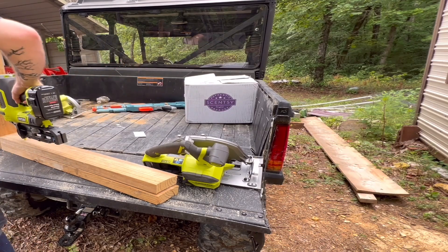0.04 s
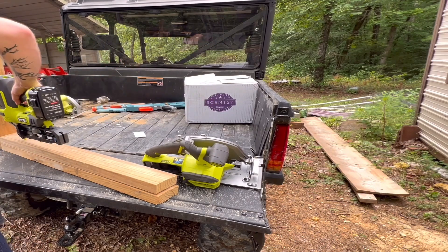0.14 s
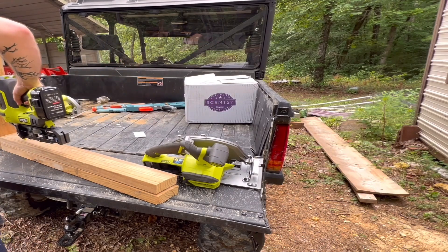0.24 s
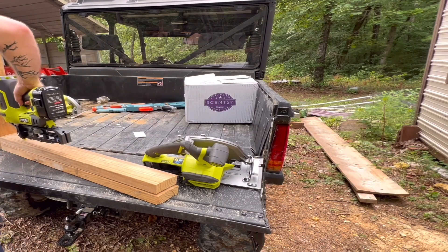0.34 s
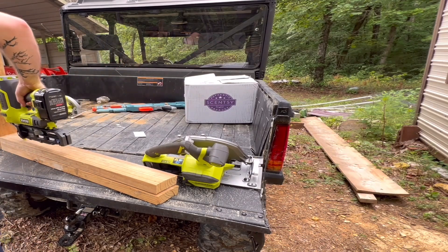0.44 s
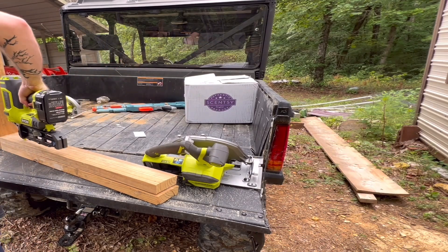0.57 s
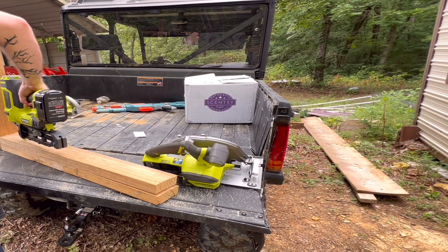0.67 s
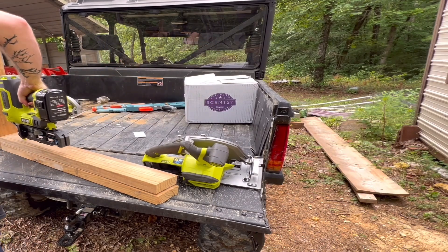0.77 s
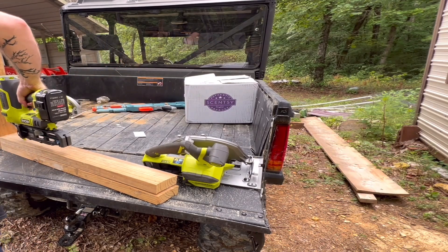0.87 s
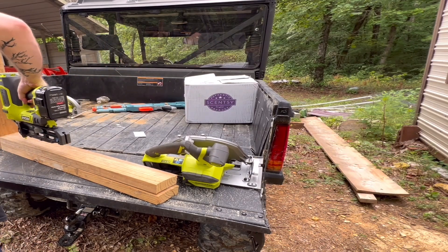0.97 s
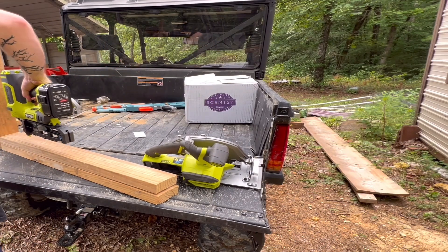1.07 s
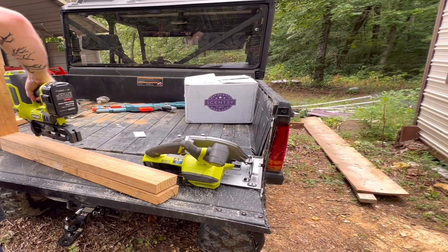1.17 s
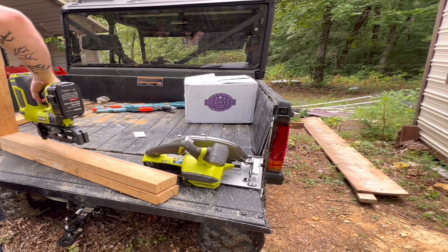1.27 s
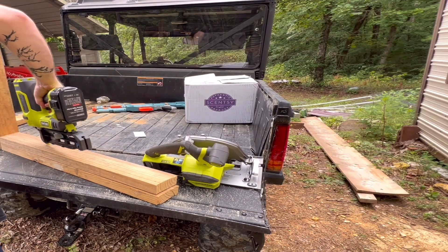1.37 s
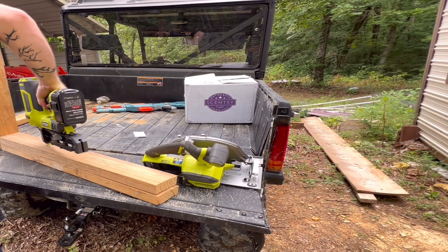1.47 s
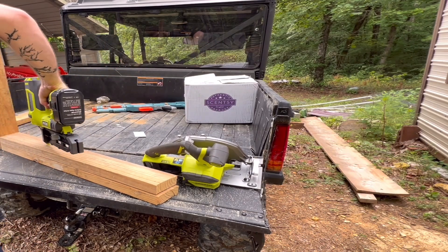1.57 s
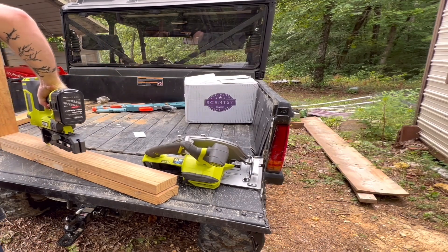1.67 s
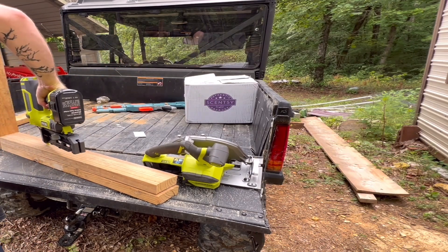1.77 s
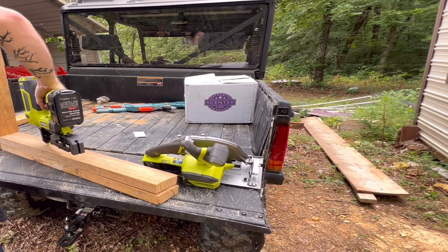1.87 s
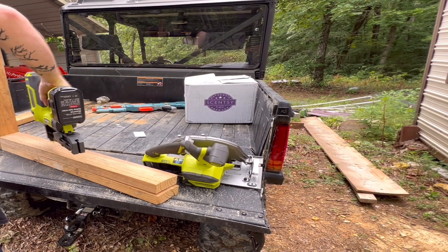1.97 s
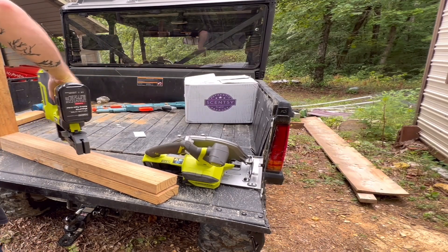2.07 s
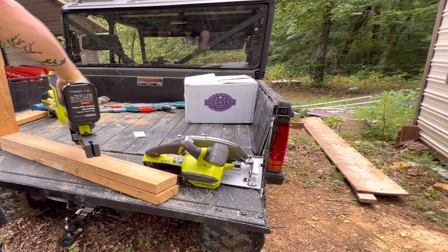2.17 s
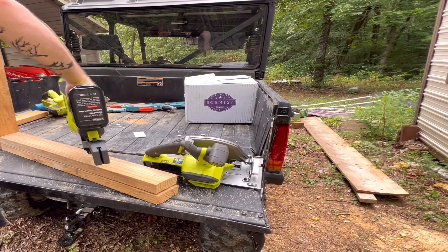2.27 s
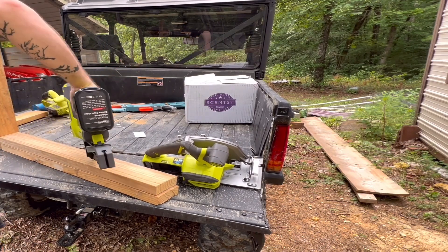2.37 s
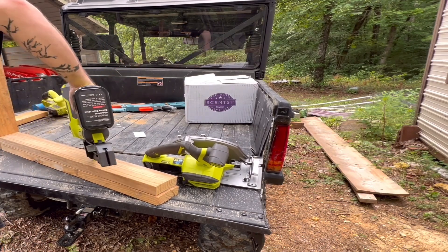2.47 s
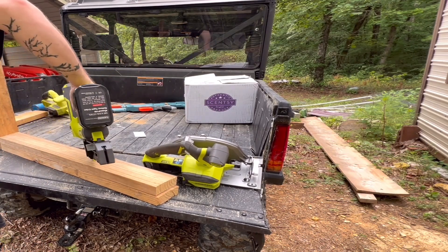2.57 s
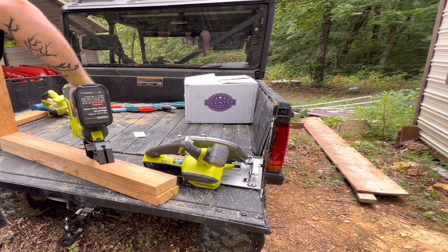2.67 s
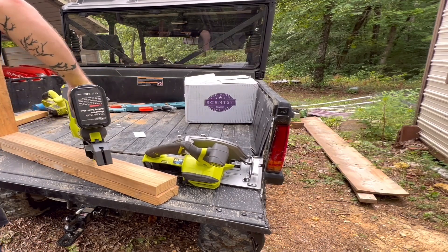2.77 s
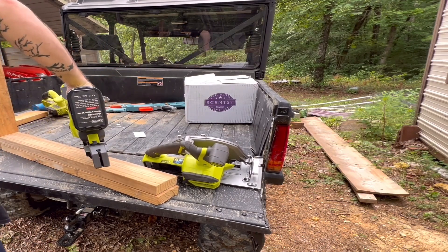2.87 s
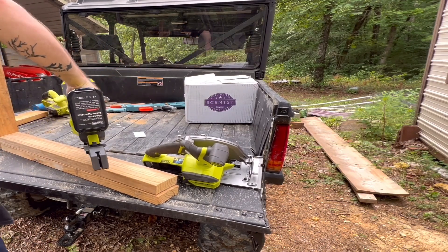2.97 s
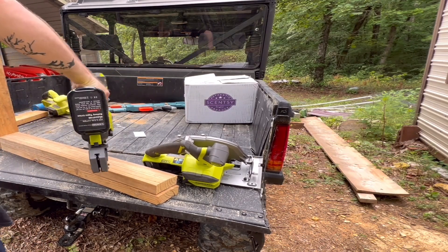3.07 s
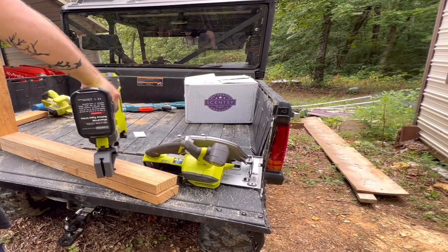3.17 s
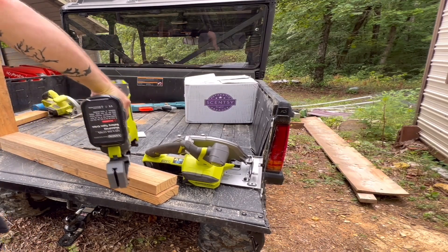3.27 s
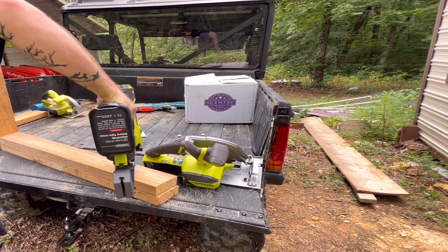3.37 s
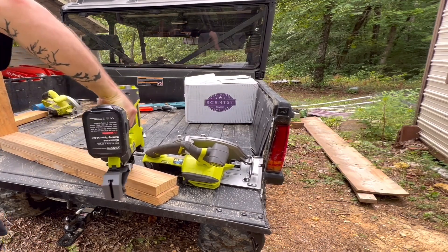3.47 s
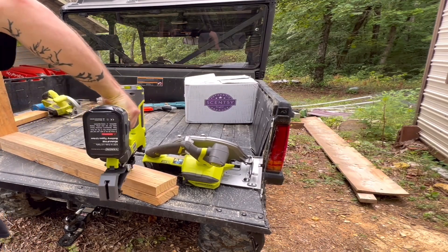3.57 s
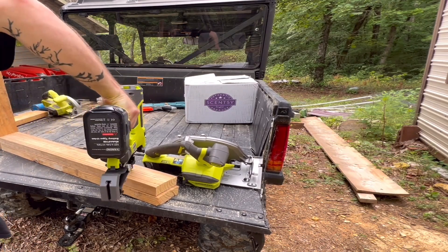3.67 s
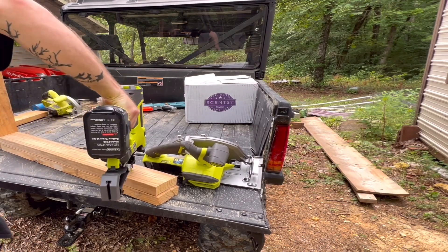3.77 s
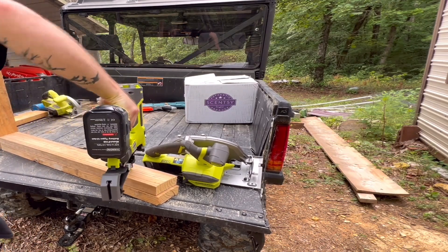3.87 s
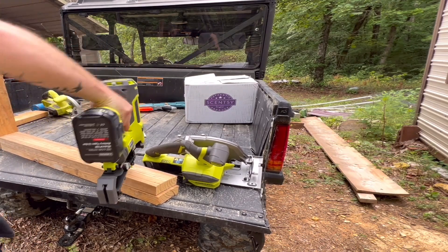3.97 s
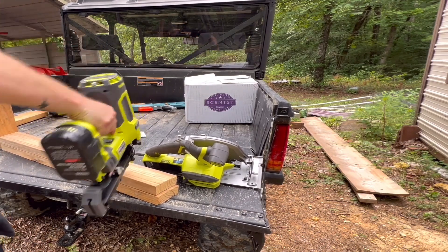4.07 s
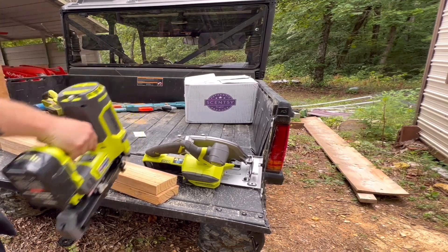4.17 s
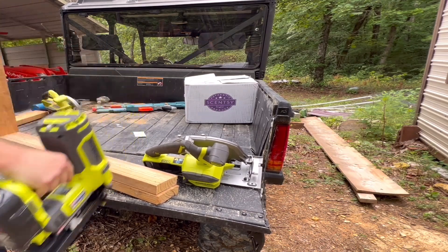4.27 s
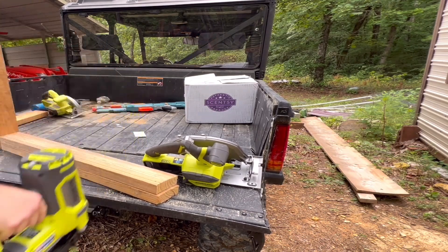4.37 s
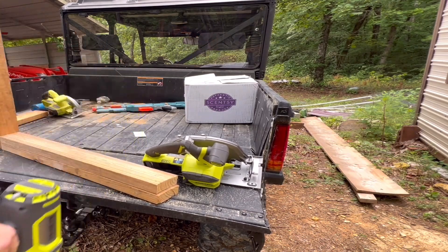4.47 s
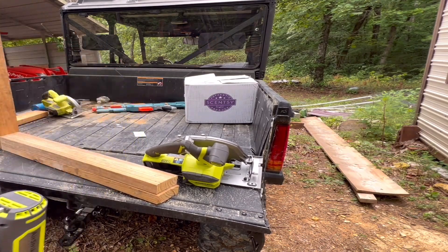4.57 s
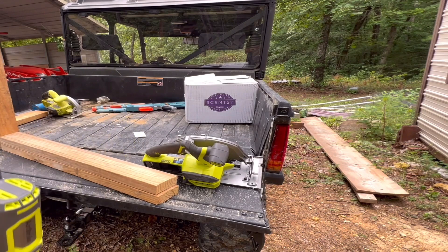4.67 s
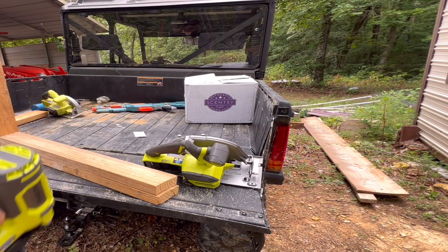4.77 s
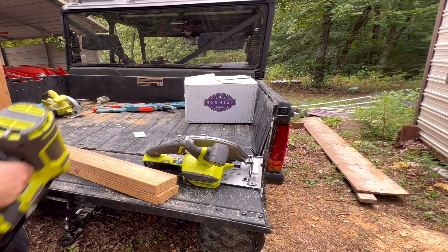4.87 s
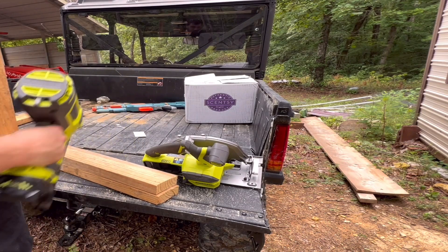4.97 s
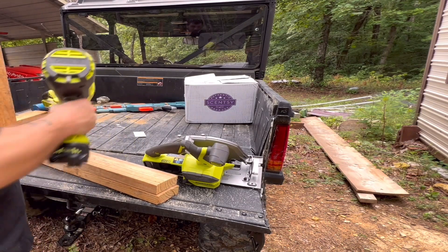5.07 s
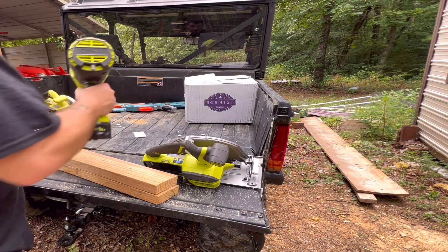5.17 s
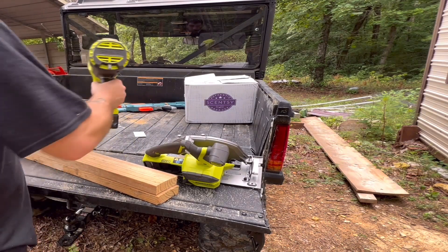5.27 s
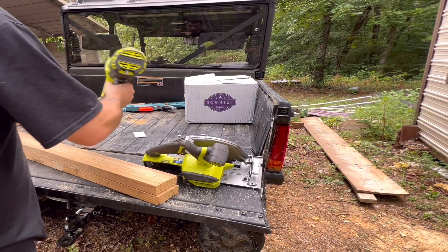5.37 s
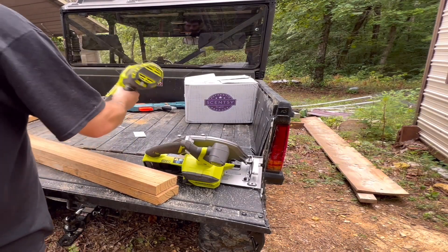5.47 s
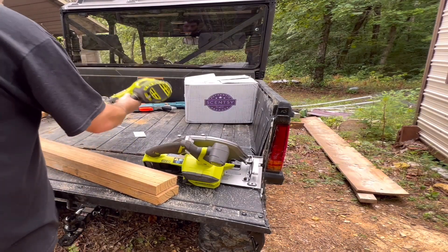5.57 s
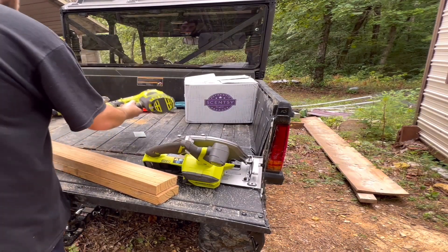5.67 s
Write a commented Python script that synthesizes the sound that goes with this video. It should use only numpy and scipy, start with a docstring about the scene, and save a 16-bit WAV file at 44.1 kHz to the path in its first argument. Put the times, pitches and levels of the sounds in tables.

```python
"""A battery nailer fires four nails into a timber beam lying on a steel truck bed, in a yard by the woods.
Each shot: trigger, motor bite, whine up (gear tones and grit), driver slam, light coasting, stop with a clack.
Blows are noise contacts that crack in the air and ring beam and bed modes; magazine steel rings on.
Coloured noise makes insects, far hiss and a low rumble; two spaced microphones hear lag and echoes."""
import sys
import numpy as np
from scipy import signal
from scipy.fft import rfft, irfft, next_fast_len
from scipy.io import wavfile
from scipy.ndimage import uniform_filter1d

SR = 44100
rng = np.random.default_rng(int(sys.argv[2]) if len(sys.argv) > 2 else 0)


def wav_out(sig):
    """Save sig, one row per channel (or a flat mono array), as 16-bit PCM at SR to the path in sys.argv[1]."""
    wavfile.write(sys.argv[1], SR, np.round(np.clip(np.atleast_2d(sig).T, -1, 1) * 32767).astype(np.int16))


def invert_db(level):
    """Linear amplitude ratio for a level in decibels (20 dB per decade), elementwise."""
    return 10 ** (np.asarray(level, dtype=float) / 20)


N = 252470
T = np.arange(N) / SR

# four moments of the cycle, one row a shot: start_s, air_db, body_db (beam and bed)
TRIGGER = [(0.5045, -27, -49.5), (1.49, -27, -46.5), (2.5447, -39.5, -51.5), (3.4472, -39, -55)]
BITES = [(0.5365, -23.5, -22.5), (1.5187, -21, -21.5), (2.5735, -41, -29.5), (3.478, -36.5, -28.5)]
SHOTS = [(0.766, -9, -19.5), (1.748, -10, -17.5), (2.8035, -12, -17), (3.709, -11.5, -18)]
STOPS = [(1.0319, -19, -32.5), (2.0122, -30.5, -43.5), (3.0668, -30.5, -41.5), (3.9701, -29.5, -39)]
# tool positions: start_s
PLACES = [0, 1.25, 2.2, 3.2, 4.15]


def curve(table, t=T):
    """Columns of a (s, value, ..) table, interpolated at every sample."""
    s, *columns = np.transpose(table)
    return [np.interp(t, s, c) for c in columns]


def gate(t0, t1, fade_s=0.007, t=T):
    """1 between t0 and t1, with linear ramps."""
    return np.clip(np.minimum(t - t0, t1 - t) / fade_s + .5, 0, 1)


def colour(x, points):
    """Filter by (Hz, dB) points, interpolated over log frequency."""
    hz, db = np.transpose(points)
    size = next_fast_len(x.shape[-1])
    f = np.arange(size // 2 + 1) * SR / size + 1
    gain = invert_db(np.interp(np.log(f), np.log(hz + 1), db))
    return irfft(rfft(x, size) * gain, size)[..., :x.shape[-1]]


def unit(x, band_hz=None):
    """Scale to rms 1, over all or in a band."""
    part = x
    if band_hz is not None:
        part = signal.sosfilt(signal.butter(4, band_hz, "band", fs=SR, output="sos"), x)
    return x / np.sqrt(np.mean(part ** 2))


def walk(rate_hz, size=N):
    """Random levels held 1 / rate_hz and slewed twice; spread near 1."""
    k = int(SR / rate_hz)
    held = np.repeat(rng.standard_normal(size // k + 1), k)
    return 1.3 * uniform_filter1d(uniform_filter1d(held, k), k)[:size]


def ring(modes, seconds):
    """Complex decaying response of each (Hz, dB, t60 s) mode, one a row."""
    hz, db, t60_s = (c[:, None] for c in np.transpose(modes))
    t = np.arange(int(seconds * SR)) / SR
    return invert_db(db) * np.exp((2j * np.pi * hz - np.log(1000) / t60_s) * t)


def add(out, x, s):
    """Mix x into out from time s."""
    i = int(s * SR)
    out[i:i + len(x)] += x[:len(out) - i]


def follow(x, attack, release):
    """Level follower: a quick average, then a slow fall."""
    quick = signal.lfilter([attack], [1, attack - 1], x)
    return np.maximum(quick, signal.lfilter([release], [1, release - 1], quick))


def yard():
    """Insects and far hiss, unrelated at the microphones and louder on the left; the rumble is nearly shared."""
    # far hiss with an insect choir near 8 kHz: freq_hz, density_db
    hiss_colour = [(80, -10.5), (125, 0), (200, -7), (400, -10.5), (800, -12), (1300, -16), (2000, -19.5),
                   (2600, -22.5), (4000, -19), (6300, -19.5), (7500, -16), (8050, -9.5), (8600, -19),
                   (9800, -31.5), (10600, -40.5), (11300, -93)]
    # start_s, level_db
    hiss_level = [(0, -58), (.5, -61.5), (1.2, -54.5), (1.45, -62), (2.2, -70), (3.2, -71), (4.2, -71),
                  (4.9, -72.5), (5.72, -73)]
    # lower insects: freq_hz, density_db
    choir_colour = [(4300, -31.5), (4700, -1), (5050, 1), (5500, -3.5), (6800, -10), (7400, -33)]
    # start_s, level_db
    choir_level = [(0, -75.5), (1.3, -72.5), (2.2, -79), (4.5, -87.5), (4.8, -85.5), (5.3, -74.5),
                   (5.72, -78.5)]
    # freq_hz, density_db
    rumble_colour = [(15, -28.5), (30, -8.5), (58, 9), (90, 3.5), (140, -13), (250, -62)]
    # lifted while the truck bed shakes: start_s, level_db
    rumble_level = [(0.0, -61), (0.4, -59.5), (0.94, -56), (1.29, -55.5), (1.67, -51.5), (2.15, -67.5),
                    (2.34, -68.5), (2.5, -59.5), (2.88, -60), (3.23, -67), (3.79, -58), (4.17, -67),
                    (4.62, -69.5), (4.8, -71.5), (5.35, -75.5), (5.72, -67)]
    hiss = unit(colour(rng.standard_normal((2, N)), hiss_colour))
    air = hiss * invert_db(curve(hiss_level)[0] + walk(2.4))
    choir = unit(colour(rng.standard_normal((2, N)), choir_colour))
    air += choir * invert_db(curve(choir_level)[0] + 2.5 * walk(14))
    rumble = unit(colour(rng.standard_normal((2, N)), rumble_colour))
    mid, side = rumble * invert_db(curve(rumble_level)[0] + 2.0 * walk(2.3))
    left_right = invert_db(np.array([[1.5], [-1.5]]))
    return np.sqrt(2) * air * left_right + mid + 0.12 * side * np.array([[1], [-1]])


def tail(t60_s, db):
    """Scattered echoes: decaying noise with unit energy, scaled."""
    t = np.arange(int(t60_s * SR)) / SR
    x = rng.standard_normal(len(t)) * np.exp(-np.log(1000) * t / t60_s)
    return invert_db(db) * x / np.sqrt(np.sum(x ** 2))


def place_spans():
    """First and end sample of each tool position."""
    edges = (np.array(PLACES + [T[-1]]) * SR).astype(int)
    return list(zip(edges, edges[1:]))


def wash(knocks, whir):
    """Shed wall and trees return a faint wash, most of it from the knocks that the bed throws outward."""
    source = knocks + .5 * whir
    return np.array([signal.fftconvolve(source, tail(0.72, -20.5))[:N] for _ in range(2)])


def wall_echoes(tool):
    """Bed walls echo with opposite sign to left and right, in a new pattern at every place."""
    # microphone difference: freq_hz, side_minus_mid_db
    apart = [(60, -17.5), (110, -19.5), (200, -14.5), (380, -4.5), (700, 5), (1290, -0.5), (2380, -4),
             (4400, -2), (8120, 1), (15000, -0.5)]
    # surplus of the left microphone at each place: gain
    left_share = [.3, .3, .18, .25, .3]
    walls = np.zeros(N)
    for (i0, i1), left in zip(place_spans(), left_share):
        # the tool sways in the hand, so one echo pattern keeps melting into another
        sway = 0.4 * walk(25, size=i1 - i0)
        for share in (np.cos(sway), np.sin(sway)):
            add(walls, signal.fftconvolve(share * tool[i0:i1], tail(0.028, -2.8)), i0 / SR)
        walls[i0:i1] += left * tool[i0:i1]
    return colour(walls, apart) * np.array([[1], [-1]])


def spaced_pair(tool):
    """Lows reach the right microphone later than the left; the highs arrive together."""
    # right behind left at each place: lag_samples
    lags = (8, 8, 5, 4, 4)
    low = signal.sosfiltfilt(signal.butter(1, 2400, fs=SR, output="sos"), tool)
    direct = np.array([tool - low] * 2)
    for (i0, i1), lag in zip(place_spans(), lags):
        direct[0, i0:i1] += np.roll(low, -(lag // 2))[i0:i1]
        direct[1, i0:i1] += np.roll(low, lag - lag // 2)[i0:i1]
    return direct


def magazine():
    """Thin steel that rings on after every drive, blurred as the tool moves."""
    # freq_hz, level_db, t60_s
    steel = [(1762, 0, 1.1), (1740, 2.5, 2.8), (1770, 1.5, 1.1)]
    # shot by shot: level_db
    steel_db = (-53, -57, -60, -61)
    out, modes = np.zeros(N), ring(steel, 1.3)
    size = modes.shape[1]
    for row, db in zip(SHOTS, steel_db):
        blur = np.array([walk(250, size=size) + 1j * walk(250, size=size) for _ in modes])
        add(out, invert_db(db) * (modes * blur).imag.sum(axis=0) * np.linspace(1, 0, size), row[0])
    return out


def recoil():
    """The drive shoves beam and bed down and they spring back: a damped swing with 9 ms half periods."""
    out, t = np.zeros(N), T[:int(.12 * SR)] / .009
    for row in SHOTS:
        add(out, np.sin(np.pi * t) * np.exp(-.7 * t), row[0])
    return invert_db(-21) * out


def tone(turns, db, waver_db=3.0, blur_rad=0.77):
    """A gear tone near the given rms level; teeth are uneven, so level and phase waver."""
    phase = 2 * np.pi * (turns + rng.random()) + blur_rad * walk(120, size=len(turns))
    return np.sqrt(2) * invert_db(db + waver_db * walk(60, size=len(turns))) * np.sin(phase)


def clatter(turns):
    """Tooth faults come round every second turn of the train, so this noise repeats and breaks into fine lines."""
    faults = rng.standard_normal(512)
    cycle = np.interp(turns / 2 % 1, np.arange(512) / 512, faults, period=1)
    return cycle * invert_db(2.0 * walk(90, size=len(turns)))


def lift_tones(shot, run):
    """Train turns and mesh and shaft tones under load; the speed climbs quickly from the bite and levels off."""
    # multiples of the gear train rate
    mesh = (13, 14, 27, 40, 50)
    # row a shot, column a mesh multiple: level_db early in the lift, then at its end
    mesh_early = [(-38.5, -33, -27, -47, -33.5), (-36.5, -30, -33.5, -38.5, -42.5),
                  (-41.5, -41, -41, -56.5, -54.5), (-41.5, -45, -38, -50.5, -46)]
    mesh_late = [(-35, -32, -23.5, -31.5, -57), (-26.5, -32.5, -35, -24.5, -60.5),
                 (-43.5, -49, -40.5, -46.5, -52.5), (-42.5, -46.5, -45, -39.5, -43.5)]
    # weaker shaft and gear tones: multiples of the gear train rate
    orders_weak = (2.22, 4.44, 6.63, 8, 8.8, 10, 11.1, 26.05, 30, 47.9, 53.9)
    # row a weak order, column a shot: level_db
    weak_db = [(-44, -46.5, -60, -59), (-57.5, -58, -67.5, -61.5), (-38, -48, -53.5, -43.5),
               (-47.5, -47, -55, -53), (-49, -54, -46, -46.5), (-42, -43.5, -53.5, -54),
               (-40.5, -56.5, -53, -56), (-40, -44.5, -55, -49), (-52, -65, -69.5, -70.5),
               (-43, -49, -62.5, -64.5), (-51.5, -59.5, -57, -58)]
    # gear train rate at full speed, shot by shot: rate_hz
    full_hz = (138.5, 140.0, 140.8, 140.6)
    turns = np.cumsum(full_hz[shot] - 21 * np.exp(-run / .037)) / SR
    late = np.clip((run - .04) / .14, 0, 1)
    tones = sum(tone(k * turns, a + (b - a) * late)
                for k, a, b in zip(mesh, mesh_early[shot], mesh_late[shot]))
    tones += sum(tone(k * turns, row[shot], waver_db=4.5) for k, row in zip(orders_weak, weak_db))
    return turns, tones


def coast_tones(shot, run):
    """Whine turns and tones free of load: the motor speeds up and levels off."""
    # one row a shot: end_hz, whine_db, third_db (whine / 3), shaft_db
    coast = [(6630, -46.5, -54, -53.5), (6530, -65, -57, -56), (6520, -65, -63, -53.5),
             (6620, -57.5, -69, -54.5)]
    # growth of the whine towards the stop, shot by shot: swell_db
    coast_swell_db = (14, 0, 0, 0)
    hz, high_db, third_db, shaft_db = coast[shot]
    turns = np.cumsum(hz + (6130 - hz) * np.exp(-run / 0.044)) / SR
    shaft = turns * .0495
    whine = tone(turns, high_db + coast_swell_db[shot] * np.minimum(run / .14 - 1, 0))
    whine += tone(turns / 3, third_db) + tone(shaft, shaft_db)
    whine += tone(2 * shaft, shaft_db - 5, waver_db=4.5) + tone(turns * .26, shaft_db - 7, waver_db=1)
    return turns, whine


def grit_level(shot, trigger, bite, strike, stop):
    """Grit level: loaded lift, free run with rattling parts, then decay after the stop."""
    # one row a shot: load_db, free_db (at first), last_db (at the stop)
    motor_db = [(-43.5, -65.5, -47), (-42.5, -60, -56.5), (-53, -58, -55.5), (-52.5, -62, -52.5)]
    load_db, free_db, last_db = motor_db[shot]
    rise_db = np.interp(T, [trigger, bite, bite + 0.036], [-13.5, -5, 0])
    level = invert_db(load_db + rise_db) * gate(trigger + .006, strike)
    free = invert_db(np.interp(T, [strike + .1, stop], [free_db, last_db]))
    rattle = invert_db(-49 - 177.5 * np.clip(T - strike - .035, 0, 1))  # 177.5 dB/s
    level += np.hypot(free, rattle) * gate(strike + .029, stop + .03)
    brake = invert_db(last_db - 13 - 130 * np.clip(T - stop - .03, 0, 1))  # 130 dB/s
    return level + brake * gate(stop + .03, stop + .3)


def motor():
    """Mesh and shaft tones locked to the gear train, over gritty coloured noise."""
    # coloured noise for the gear grit as heard, with gaps in the treble: freq_hz, density_db
    whir_colour = [(88, -40.5), (150, -22), (317, -2), (417, -27.5), (630, -12), (1310, -8.5), (1620, -8),
                   (4600, -9.5), (6550, -8.5), (10300, -21), (12000, -23), (13000, -19.5), (13800, -40.5),
                   (15300, -16.5), (16500, -48.5)]
    out, teeth, level, run = np.zeros(N), np.zeros(N), np.zeros(N), T[:SR // 4]
    for shot in range(len(SHOTS)):
        trigger, bite, strike, stop = (table[shot][0] for table in (TRIGGER, BITES, SHOTS, STOPS))
        turns, tones = lift_tones(shot, run)
        add(teeth, clatter(turns), bite)
        lift_gate = np.clip(run / 0.034, 0, 1) * gate(.02, strike - bite - .004, 0.0032, run)
        add(out, tones * lift_gate, bite)
        coast_s = strike + 0.1
        turns, whine = coast_tones(shot, run)
        add(teeth, clatter(turns / 45), coast_s - .06)
        add(out, whine * gate(.01, stop - coast_s, 0.02, run), coast_s)
        level += grit_level(shot, trigger, bite, strike, stop)
    grit = rng.standard_normal(N) * invert_db(0.81 * walk(640) + 1.1 * walk(70)) + 0.23 * teeth
    return out + level * unit(colour(grit, whir_colour), (7600, 9800))


def blows(table, fade_s, knock_hz, focus_db, knock_focus_db=1.5, spread_db=2.5):
    """Each blow is a short rattle of contacts: it cracks in the air, knocks the beam and thuds in the bed."""
    # modes: freq_hz, level_db, t60_s
    beam_modes = [(510, -1, 0.063), (547, -6.5, 0.021), (604, 2, 0.05), (685, 0, 0.043), (781, -2, 0.06),
                  (900, 4.5, 0.024), (980, -5, 0.031), (1065.6, 3, 0.02), (1194, -4, 0.07), (1295, 0, .025),
                  (1520, -3, 0.03), (1662, -1.5, 0.034), (1770, -2.5, 0.026), (1815, -4.5, 0.0082),
                  (2030, -4, 0.022), (2380, -0.5, 0.015), (2567, -7.5, 0.051), (2820, -15, 0.029),
                  (3430, -11.5, 0.0095), (3620, -9, 0.0084)]
    bed_modes = [(35, -5.5, 0.099), (60, -7, 0.62), (92, -10, 0.15), (102, -12.5, 0.28), (157, -3, 0.12),
                 (196, 0.5, 0.15), (225, -8.5, 0.16), (251, 4.5, 0.065), (287, -1.5, 0.089),
                 (329, 3, 0.083), (386.6, -2, 0.068), (440, -6.5, 0.02), (485, -5, 0.017)]
    # freq_hz, density_db
    crack_colour = [(1180, -24.5), (2000, 0), (3210, 0.5), (6650, -1.5), (8850, -6.5), (10200, -17.5),
                    (12100, -8), (13900, -27), (15800, -17), (16800, -48)]
    out, t = np.zeros(N), T[:int(.12 * SR)]
    beam, bed = ((np.transpose(modes)[0], ring(modes, 0.22)) for modes in (beam_modes, bed_modes))
    for s, crack_db, knock_db, thud_db, length_s, thud_hz in table:
        shape = np.minimum(t / 0.00079, 1) * np.exp(-np.clip(t - length_s, 0, 1) / fade_s)
        shape *= 0.8 + 0.65 * np.exp(-t / 0.0022)  # the first contact is the hardest
        uneven = invert_db(spread_db * rng.standard_normal(len(t) // 16 + 1)).repeat(16)[:len(t)]
        contacts = rng.standard_normal(len(t)) * uneven
        add(out, invert_db(crack_db) * 0.31 * shape * unit(colour(contacts, crack_colour)), s)
        push = contacts * np.exp(-t / (0.85 * length_s + 0.0021))
        for (hz, body), db, centre_hz, focus in ((beam, knock_db, knock_hz, knock_focus_db),
                                                 (bed, thud_db, thud_hz, focus_db)):
            # every blow lands elsewhere: it favours modes near its centre, in a mix of its own
            near_db = -focus * np.log2(hz / centre_hz) ** 2 + spread_db * rng.standard_normal(len(hz))
            mix = invert_db(near_db) * rng.choice([-1, 1], len(hz))
            sound = signal.fftconvolve(push, (mix @ body).imag)
            add(out, invert_db(db) * sound / np.sqrt(uniform_filter1d(sound ** 2, size=600).max()), s)
    return out


def unfold(events, steps):
    """One blow for every contact of every event."""
    return [(s + delay, air_db + crack_db, body_db + knock_db, body_db + thud_db, length_s, hz)
            for s, air_db, body_db in events
            for delay, crack_db, knock_db, thud_db, length_s, hz in steps]


def handling():
    """Tool bumped and rattled in the hand."""
    # start_s, crack_db, knock_db, thud_db
    bumps = [(0.0707, -59.5, -60, -74), (.1414, -63, -49.5, -61), (.3217, -45.5, -54.5, -56.5),
             (.3765, -38, -50.5, -56.5), (0.4594, -49, -60, -78.5), (4.1929, -53, -60, -68),
             (4.2806, -61.5, -64, -72), (4.4744, -71.5, -61, -71), (4.5897, -61, -90, -75),
             (4.7909, -70, -83, -81), (4.9702, -72, -78, -78), (5.04, -78, -67.5, -68.5),
             (5.5174, -53.5, -69.5, -74), (5.5494, -61, -66, -85), (5.5798, -56, -66, -85),
             (5.6033, -54.5, -66, -82)]
    return blows([(*row, .007, 245) for row in bumps], 0.0051, 1400, 5.4)


def nose_and_rocks():
    """The nose is set on the beam; the beam rocks on the bed under the hand's weight."""
    # start_s, crack_db, knock_db, thud_db, length_s
    nose = [(1.3444, -12, -36.5, -56, 0.0017), (1.352, -41.5, -41.5, -40.5, 0.021),
            (2.3063, -34.5, -49, -55, 0.016), (2.3289, -36.5, -31.5, -28, 0.022),
            (3.301, -34, -50, -59.5, .012), (3.335, -44.5, -40, -34.5, 0.021)]
    # start_s, thud_db, length_s
    rocks = [(1.39, -37, .047), (2.3894, -35.5, .03), (3.3894, -42.5, 0.018)]
    table = [(*row, 290) for row in nose]
    table += [(s, db - 16.5, db - 18.5, db, length_s, 90.1) for s, db, length_s in rocks]
    return blows(table, 0.014, 890, 9, knock_focus_db=0)


def cycle_blows():
    """Contacts of each shot's cycle: trigger, bite, drive and stop."""
    # contacts in each moment: delay_s, crack_db, knock_db, thud_db (added to the event), length_s, thud_hz
    # switch, then relay
    trigger_steps = [(0, 0, 0, -13, 0.0024, 200), (0.02, -7, -0.5, -15.5, .003, 200)]
    # pawl meets the driver, then takes the load
    bite_steps = [(0, 1, 0, -8.5, 0.0049, 222.5), (.015, -2, -0.5, -3.5, .004, 223)]
    # brake clacks, tool settles
    stop_steps = [(0, 1, -1, -14.5, 0.014, 297), (.025, -15, -2, 1.5, 0.012, 225)]
    # latch lets go, nail is struck, driver bottoms out, tool bounces and lands once more
    shot_steps = [(-.004, -19, -5, -16, .003, 300), (0, -0.5, 2.5, -1, .0036, 200),
                  (.0046, 4.5, -2.5, -7, .004, 330), (.012, -8, -12, -16, .0145, 200),
                  (.076, -40, -27, -26.5, .004, 292.3)]
    out = blows(unfold(TRIGGER, trigger_steps), 0.0027, 1500, 7)
    out += blows(unfold(BITES, bite_steps), 0.0037, 1300, 19, knock_focus_db=23.5)
    out += blows(unfold(STOPS, stop_steps), .009, 1300, 260, knock_focus_db=8.5)
    return out + blows(unfold(SHOTS, shot_steps), .003, 730, 5.8)


def scene():
    """Tool and blows at two microphones, with wall echoes, a faint wash and the yard."""
    knocks = magazine() + recoil() + handling() + nose_and_rocks() + cycle_blows()
    whir = motor()
    tool = whir + knocks
    return spaced_pair(tool) + wall_echoes(tool) + wash(knocks, whir) + yard()


def band_limit(x):
    """A steep low-pass at the top of the band."""
    return signal.sosfilt(signal.butter(12, 16970, fs=SR, output="sos"), x)


def record(dry):
    """The microphones lose the deepest bass; a limiter clamps down a few ms into each shot and rounds the peaks."""
    thin = signal.sosfilt(signal.butter(1, 30, "high", fs=SR, output="sos"), dry)
    level = follow(np.abs(thin).max(axis=0), 1 / (0.0054 * SR), 1 / (.02 * SR))  # attack, release: s
    held = thin * np.minimum(1, (invert_db(-13.0) / level) ** 0.36)
    mix = np.tanh(0.86 * held) / 0.75
    return band_limit(mix)


dry = scene()
out = record(dry)
wav_out(out)
```